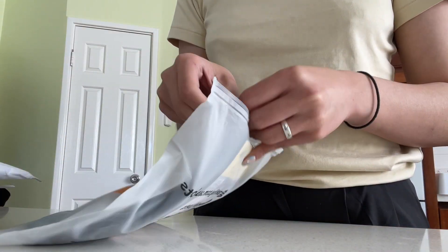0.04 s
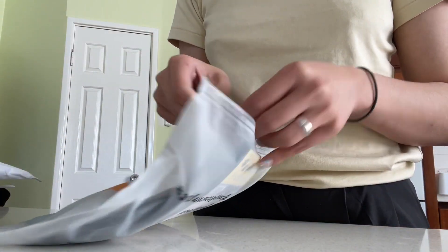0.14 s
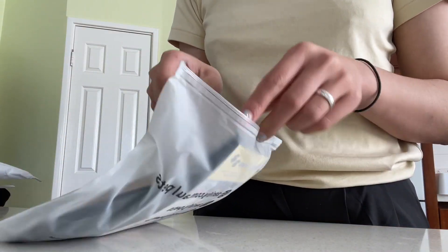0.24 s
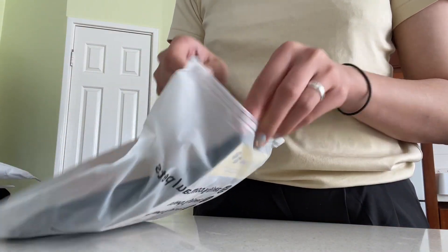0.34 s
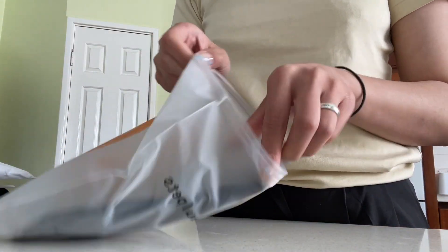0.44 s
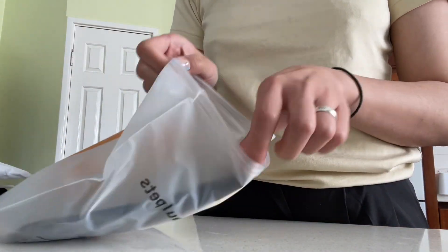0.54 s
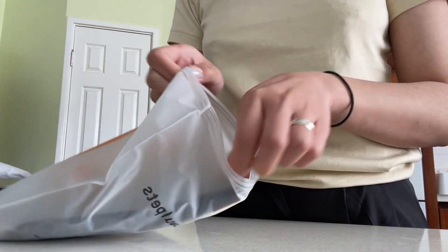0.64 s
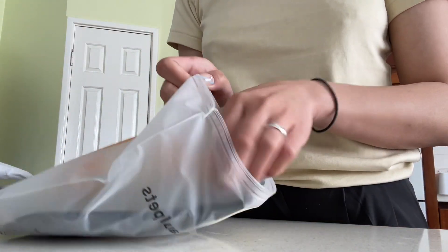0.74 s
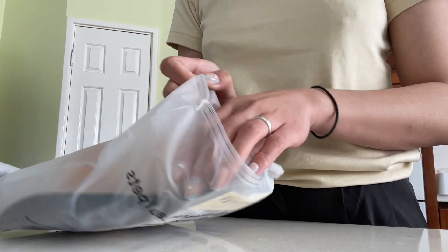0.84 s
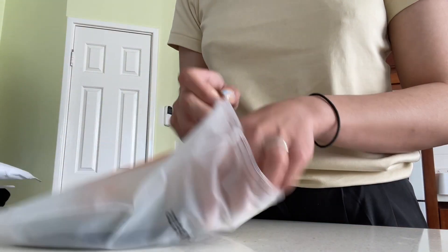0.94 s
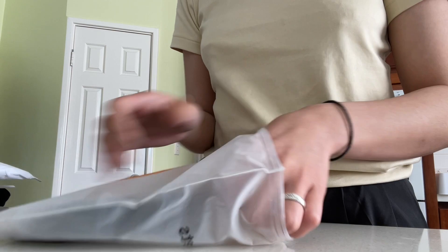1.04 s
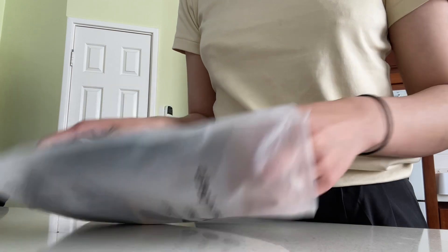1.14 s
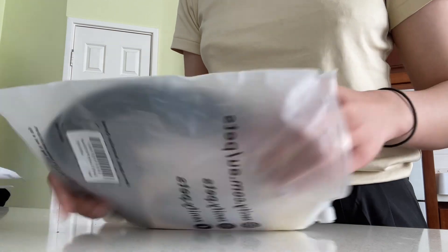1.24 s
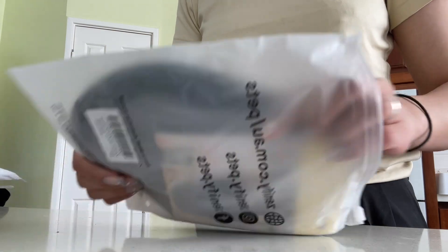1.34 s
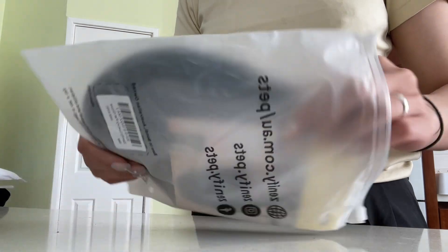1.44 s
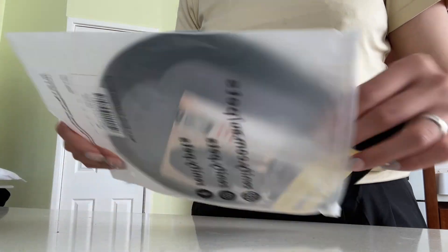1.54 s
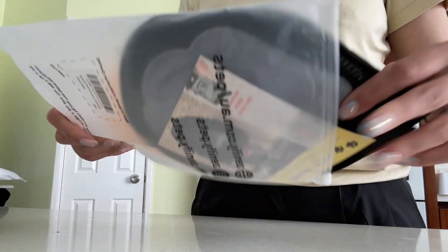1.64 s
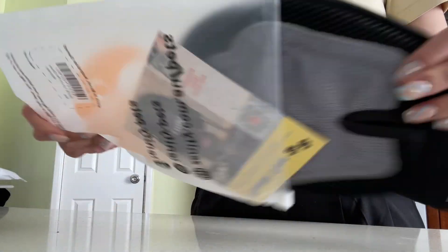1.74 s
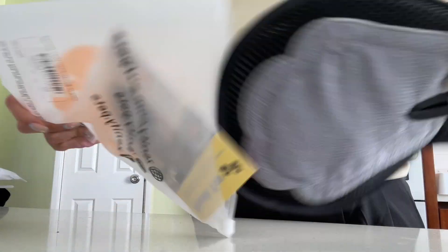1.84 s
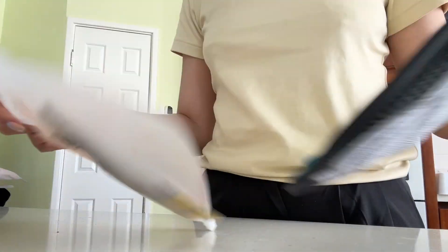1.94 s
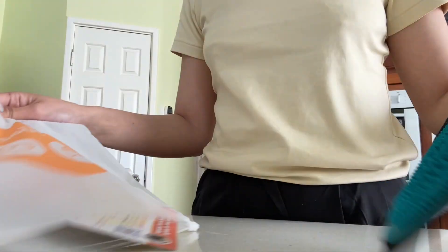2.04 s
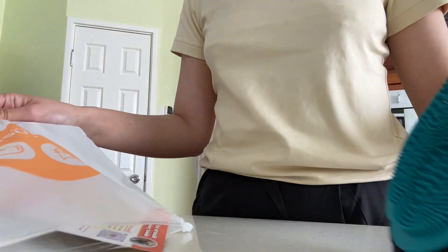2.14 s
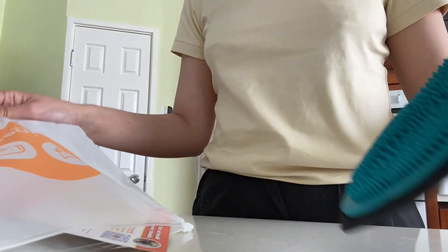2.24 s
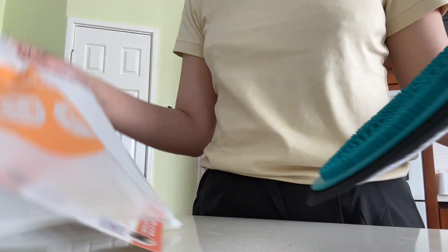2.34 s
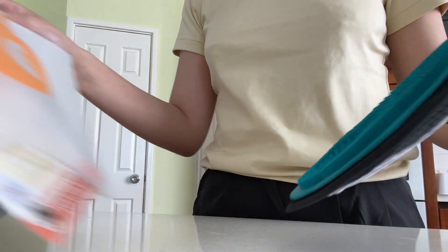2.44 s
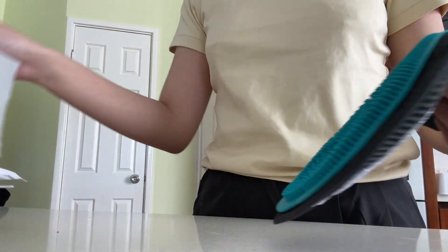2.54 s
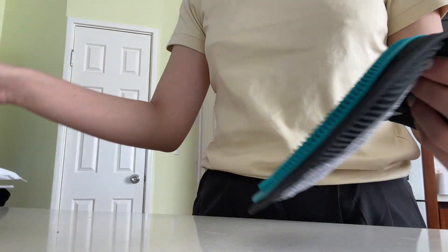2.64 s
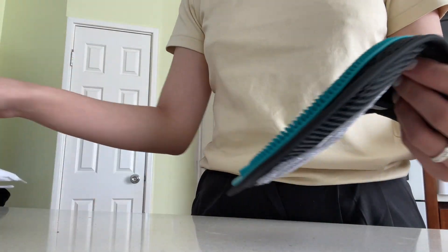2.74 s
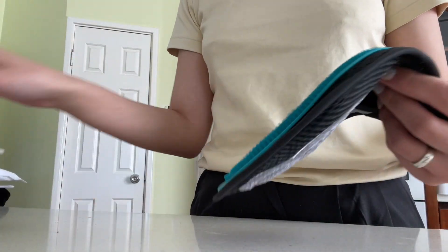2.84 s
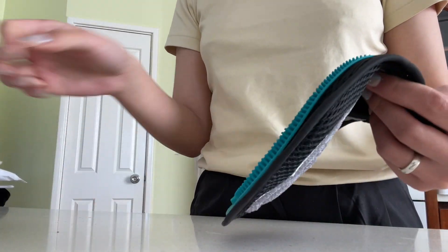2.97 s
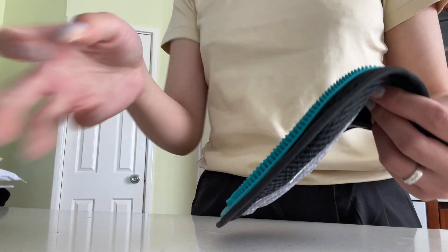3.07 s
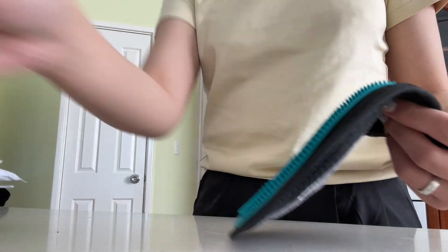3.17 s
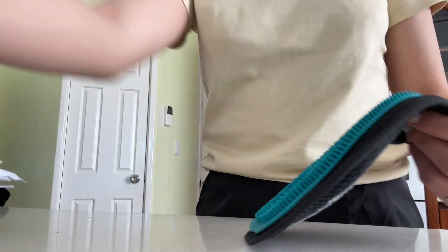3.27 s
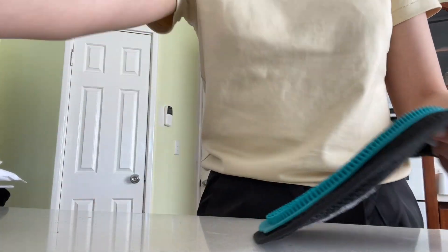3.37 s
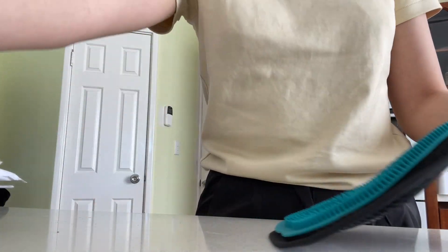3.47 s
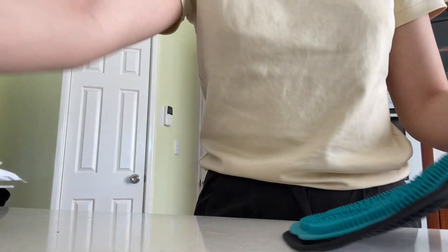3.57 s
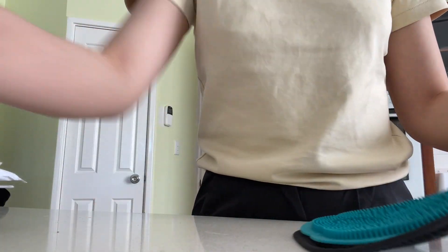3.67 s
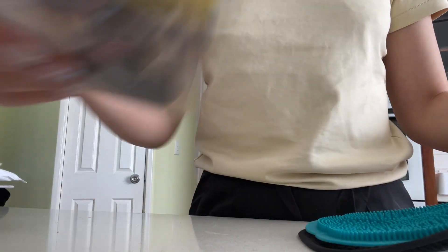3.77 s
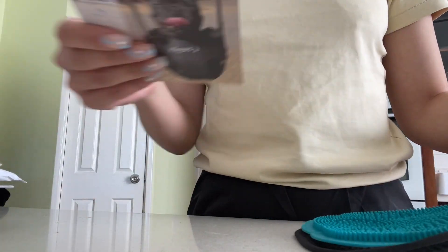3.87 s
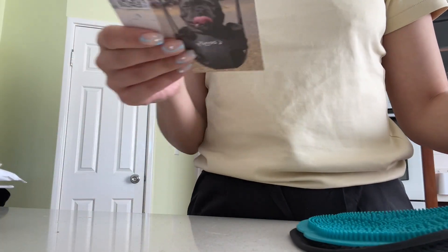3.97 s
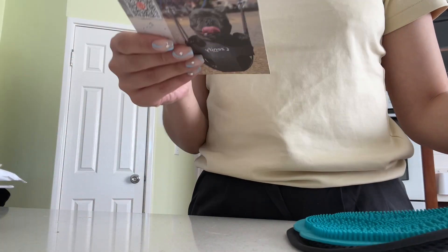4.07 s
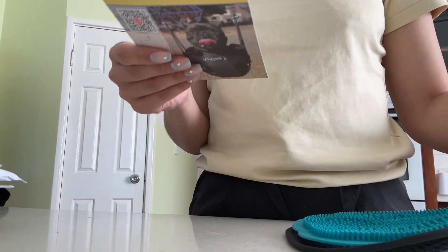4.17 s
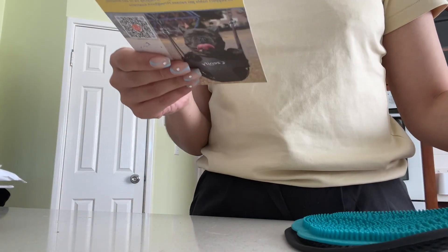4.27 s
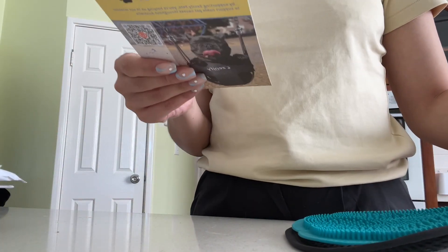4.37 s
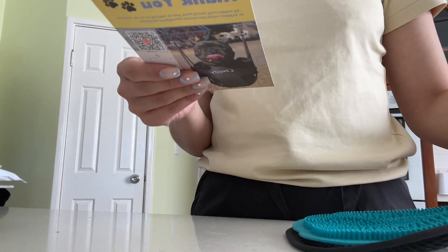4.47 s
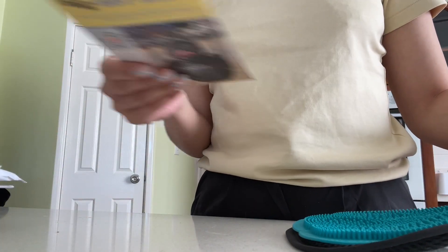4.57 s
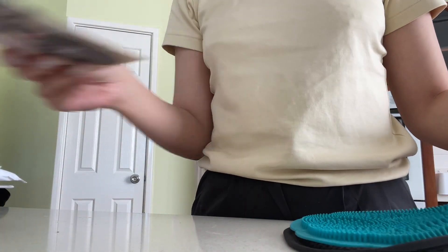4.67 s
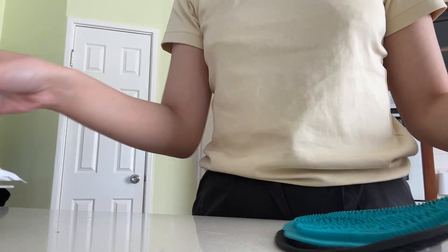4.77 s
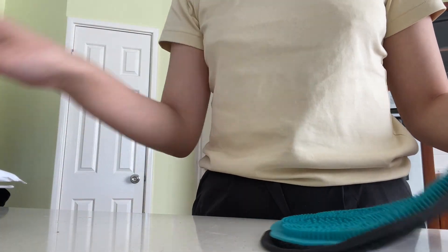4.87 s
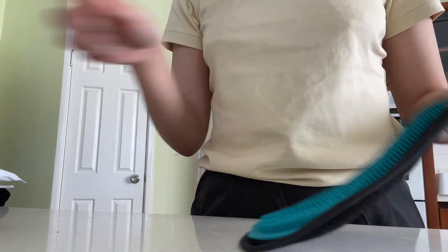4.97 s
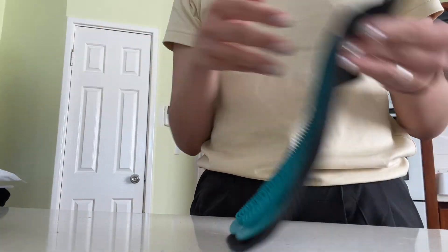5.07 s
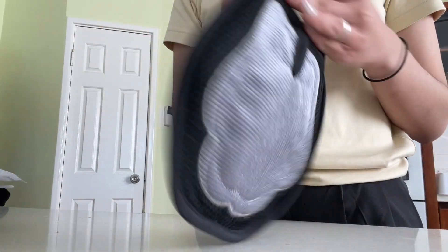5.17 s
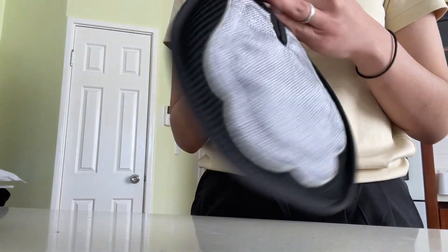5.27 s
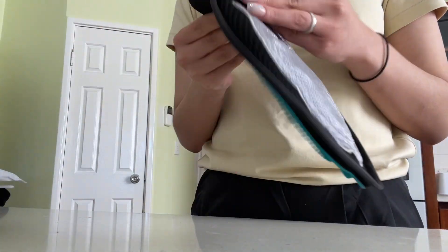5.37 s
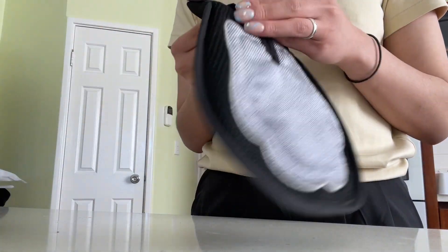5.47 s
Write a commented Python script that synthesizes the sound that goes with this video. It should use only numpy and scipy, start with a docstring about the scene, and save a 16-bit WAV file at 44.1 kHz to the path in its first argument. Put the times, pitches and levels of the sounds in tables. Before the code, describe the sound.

Close stereo sound of a soft plastic bag being opened over a kitchen counter in a quiet room. From 0 to 1.3 seconds, fingers work the film: crisp snaps, tiny crackles and rounder, hollow pops over uneven rustling, strongest around 0.5 and 0.8 to 1.1, with a few dull low bumps. From about 1.3 to 1.9 a rubber-and-cloth glove slides out in a smoother, broader rush, loudest near 1.6 to 1.7. The crinkle then falls away, leaving small rustles and ticks around 2.4 to 2.6. A light knock comes at 2.7, a firmer one at 3.4, and another with a brighter rustle at 3.6 to 3.75, each with a short counter ring. Near quiet follows around 4 to 4.5. Soft, dull cloth and palm strokes finish from 4.5 to 5.5, with faint taps near 4.9 and 5.2 and a barely audible low room hum.

```python
"""Sharp snaps of soft plastic film come first, over a sliding rustle: hands open a bag on a kitchen counter.
A rubber-and-cloth glove slides out in a smoother rush, then bag and card are put aside with knocks on the counter.
Snaps, pops and knocks are short tones with noise; the rustle is noise, crackle and puckers shaped in time and pitch.
The counter adds ringing modes and a bounce, and a faint room lies behind; two microphones listen close by."""
import sys
import numpy as np
from scipy import signal
from scipy.fft import rfft, irfft, next_fast_len
from scipy.io import wavfile
from scipy.ndimage import uniform_filter1d, map_coordinates

SR = 44100
rng = np.random.default_rng(int(sys.argv[2]) if len(sys.argv) > 2 else 0)


def dump(signal):
    """Clip the signal to [-1, 1] and save it as 16-bit WAV at the path in sys.argv[1]."""
    limited = np.clip(np.atleast_2d(signal).T, -1, 1)
    pcm = np.round(limited * 32767).astype(np.int16)
    wavfile.write(sys.argv[1], SR, pcm)


N = 242991  # length in samples
STFT = dict(fs=SR, nperseg=512, noverlap=384)


def amp(db):
    """Turns decibels into an amplitude factor."""
    return 10 ** (np.asarray(db) / 20)


def evened(x):
    """Scales a sound to an RMS of one."""
    return x / np.sqrt(np.mean(x ** 2) + 1e-20)


def locally_evened(x):
    """Divides a sound by its own RMS over a sliding window of about 0.2 s."""
    return x / np.sqrt(uniform_filter1d(x ** 2, 9000) + 1e-12)


def read(points, hz):
    """Reads a frequency curve, joined by straight lines on a log frequency axis."""
    f, value = np.transpose(points)
    return np.interp(np.log(hz + 1), np.log(f + 1), value)


def curve(rows, t):
    """Reads every column of a table over time, joined by straight lines."""
    s, *columns = np.transpose(rows)
    return [np.interp(t, s, c) for c in columns]


def add(mix, s, sound):
    """Lays a sound into the mix from time s in seconds."""
    part = mix[round(s * SR):][:len(sound)]
    part += sound[:len(part)]


def coloured(x, gain):
    """Multiplies the whole spectrum by gain(Hz)."""
    size = next_fast_len(x.shape[-1])
    spectrum = rfft(x, size) * gain(np.fft.rfftfreq(size, 1 / SR))
    return irfft(spectrum, size)[..., :x.shape[-1]]


def band(hz, centre_hz, width_hz):
    """Resonance-shaped hump that is one at its centre and a half at the edges of its width."""
    return 1 / (1 + (2 * (hz - centre_hz) / width_hz) ** 2)


# Likeness of the noise at the two microphones.
# Each row: frequency in Hz, left-right likeness from 0 to 1.
LIKENESS = [(60, 0.96), (150, .75), (300, 0.41), (600, 0.11), (1500, 0.097), (5000, 0.055)]


def noise_pair():
    """White noise at two microphones, most alike in the bass."""
    left, other = rng.standard_normal((2, N))
    shared = coloured(left, lambda hz: read(LIKENESS, hz))
    own = coloured(other, lambda hz: np.sqrt(1 - read(LIKENESS, hz) ** 2))
    return np.array([left, shared + own])


# Decay of the scatter from nearby surfaces.
# Each row: frequency in Hz, time to fall by 60 dB in seconds.
SCATTER_DECAY = [(300, 0.26), (1500, 0.12), (6000, 0.12), (16000, 0.061)]


def scattered(pair, wet_db):
    """Adds the scatter of nearby surfaces as a decaying noise tail, different for each microphone."""
    hz, t, z = signal.stft(rng.standard_normal((2, SR // 3)), SR, nperseg=128)
    decay = amp(-60 * t / read(SCATTER_DECAY, hz)[:, None])
    tail = signal.istft(z * decay, SR, nperseg=128)[1]
    tail = np.pad(tail / np.linalg.norm(tail[0]), ((0, 0), (60, 0)))  # 60 samples before the tail starts
    return pair + amp(wet_db) * signal.oaconvolve(pair, tail, axes=1)[:, :N]


# Where the hands work.
# Each row: time in seconds, left minus right in dB, lead of the left microphone in ms.
HAND_PLACE = [(.2, 9, 0.15), (.7, 7.5, 0.19), (1.2, 6.5, 0.19), (1.6, 21, 0.035), (1.85, 12.5, 0.13),
              (2.4, 4, 0.39), (2.8, 5, 0.51), (3.2, 8, 0.55), (3.7, 15, 0.55), (4.2, 0, 0.2),
              (4.85, -0.5, 0.51), (5.2, 3, 0.099)]


def placed(x):
    """Puts a lasting sound where the hands are: the right microphone gets a delayed, rescaled copy."""
    n = np.arange(N)
    pan_db, lead_ms = curve(HAND_PLACE, n / SR)
    delayed = map_coordinates(x, [n - lead_ms * SR / 1000], order=3)
    return np.array([x, amp(-pan_db) * delayed])


def strike(pair, s, db, rise_ms, t60, pan_db, stray_ms, carrier):
    """Shapes a carrier by a rise and a decay and lays it at both microphones, somewhere near the hands."""
    lead_ms = curve(HAND_PLACE, s)[1] + stray_ms
    t = np.arange(len(carrier)) / SR
    rise = max(rise_ms, .1) / 1000
    swell = np.sin(np.pi / 2 * t / rise) ** 2
    decay = amp(-60 * (t - rise) / max(t60, .001))
    sound = np.where(t < rise, swell, decay) * carrier
    add(pair[0], s, amp(db + pan_db / 2) * sound)
    add(pair[1], s + lead_ms / 1000, amp(db - pan_db / 2) * sound)


RAGGED_DB, RAGGED_MS = 4.5, 1.2  # full-strength unevenness and its pace


def ragged(noise, peak_s):
    """A crease gives way in small jerks: gain is sure at the peak and uneven away from it."""
    distance_ms = abs(np.arange(len(noise)) / SR - peak_s) * 1000
    away = np.clip(distance_ms / RAGGED_MS - 1, 0, 1)
    jerks = evened(uniform_filter1d(noise, int(RAGGED_MS * SR / 1000) + 1))
    return amp(RAGGED_DB * away * np.clip(jerks, -2, 1.5))


def rings(table, stray_ms, waver, smooth_cycles, puff_share, jerky, wet_db):
    """Each event is a few wavering cycles at its pitch, with a puff of noise around and above that pitch."""
    pair = np.zeros((2, N))
    chance = rng.standard_normal((len(table), 3, 6000))
    for (s, db, hz, t60, pan_db, rise_cycles), (a, b, luck) in zip(table, chance):
        drift = evened(uniform_filter1d(a, int(smooth_cycles * SR / hz) + 1))
        tone = np.sin(2 * np.pi * np.cumsum(hz * (1 + waver * drift)) / SR)
        puff = evened(coloured(b, lambda f: band(f, 1.76 * hz, 2.8 * hz) ** 2 * f / (f + hz / 2)))
        rise_s = rise_cycles / hz
        carrier = (tone + puff_share * puff) * ragged(luck, rise_s) ** jerky
        strike(pair, s, db, 1000 * rise_s, t60, pan_db, stray_ms * luck[0], carrier)
    return scattered(pair, wet_db)


TICK_RISE_MS, TICK_STRAY_MS = 0.6, 0.065  # rise; typical random shift between the microphones
# Bright ticks of creases that flip.
# Each row: start in seconds, level in dB, pitch in Hz, left minus right in dB, relative level of the top in dB,
# time to fall by 60 dB in seconds.
CREASE_TICKS = [(0.0216, -17, 3374, -1.5, -7, 0.011), (0.0355, -23, 2760, 0, -17, 0.0084),
                (.052, -37, 3000, -2, -17, 0.0054), (0.06, -40, 3670, -7, -18, 0.0091),
                (0.074, -27, 6200, -8, -16, 0.004), (0.168, -24, 3960, -10.5, 9, 0.0017),
                (0.1781, -52, 2750, -5, -11, 0.0093), (0.181, -48, 2900, 4, -11.0, 0.0035),
                (0.218, -38.5, 2700, -1, -3, 0.0037), (0.2339, -27.5, 2500, -1, -0.5, 0.011),
                (0.239, -21.5, 2700, 3, -19, 0.0042), (0.2579, -37, 2700, 1, -13, 0.0036),
                (0.283, -41, 2570.0, 9, -24, 0.0082), (0.3061, -42, 3500, 2.0, -23, 0.011),
                (0.3327, -49, 2680, -2.0, -21, 0.0163), (0.3423, -32, 2590, -13, -25, 0.02),
                (0.354, -22.5, 2680, 1, -5.5, 0.0071), (0.3578, -29, 2610, -3, -3, 0.0184),
                (0.3633, -33, 2660, -6, -14.0, 0.0037), (0.4078, -24, 2750.0, 1, -29, 0.011),
                (0.4253, -40, 4900.0, 0, -11, 0.0068), (0.4473, -34, 7660, -1, -4, 0.0128),
                (0.4626, -28, 3590.0, -9, -19, 0.014), (0.476, -27, 2750, 16, -24, 0.0055),
                (0.4893, -26.5, 3670, -10, 2, 0.0091), (0.5054, -36.5, 5500, -1, 4, 0.011),
                (0.533, -29, 2820, 6, -14.0, 0.0037), (0.5405, -26, 2550, 5, -20, 0.0045),
                (0.568, -31, 3070, -4, -11, 0.0098), (0.674, -41, 2680, -9, -11, 0.0078),
                (0.676, -49, 2640, -7, -19.0, 0.013), (0.706, -29, 3570, 0, -17, 0.02),
                (0.7093, -28, 6000, -2, 3.5, 0.01), (0.761, -38, 5300, -8, -13, 0.01),
                (0.789, -33, 6150, -11, 11, 0.0062), (0.8279, -18, 5800, 3.5, -28, 0.0037),
                (0.847, -13.5, 3810, 2.5, -15, 0.0041), (0.8505, -30, 2800, -7, 2, 0.0041),
                (0.9152, -23, 3600, 0.5, -31, 0.011), (1.0008, -25.5, 5740, -1.5, -7, 0.017),
                (1.0165, -24, 3600, -0.5, -20.5, .01), (1.037, -23, 7500, -6, -1, 0.008),
                (1.0438, -20, 2470, -6, -19, 0.018), (1.054, -22, 2600, -0.5, -19.5, 0.017),
                (1.0721, -8, 6490, -1, -12.5, 0.0015), (1.0766, -54, 6960, -4, -15, 0.0049),
                (1.164, -27, 3350, -5, -24, 0.0097), (1.1871, -21.5, 2850, 0, -27, 0.024),
                (1.299, -27, 2460, 0, -20, 0.0097), (1.3047, -25, 2800, -8, -20, .012),
                (1.3154, -23.5, 3100, -7, -17, 0.016), (1.3228, -20, 2660, 4, -23, 0.0054),
                (1.3582, -27, 3120, -15, -21, 0.0055), (1.3631, -17.5, 2930, 4.0, -28, 0.0055),
                (1.3938, -21.5, 2670, 1.0, -13, 0.0085), (1.4621, -31.0, 2750, 1, -28, 0.013),
                (1.5309, -20.5, 5650, -3, -25, 0.0078), (1.706, -13.5, 3000, 1, -31, 0.005),
                (1.7174, -16, 3230, 0.5, -7.5, 0.0099), (1.759, -21, 2750.0, 0, -21, 0.02),
                (1.851, -28, 2420, -2.0, -17, 0.008), (1.938, -38, 2940.0, -1, -13, 0.0088),
                (1.941, -49, 2980, 0, -10.0, 0.0085), (1.954, -32, 2460, -15, 6, 0.0051),
                (1.9935, -44, 2490, 3, -22, 0.021), (2.0208, -44.5, 4930, -2, -16, 0.0126),
                (2.0875, -40, 4800, -2.0, -8, 0.0032), (2.1294, -43.5, 7440, -11, -2, 0.014),
                (2.209, -60, 2630.0, -4, -22, 0.0092), (2.2726, -55, 7300, -5, -15, 0.0036),
                (2.329, -55, 2520, 7, -20.0, 0.02), (2.377, -29.5, 3640, 3, 5, 0.0098),
                (2.384, -22, 7400, -7, -1, 0.0079), (2.389, -28, 7800, -4, -12, 0.01),
                (2.403, -33.5, 2600, 0.5, -8, .015), (2.504, -54, 4180, -4, -10.0, 0.0128),
                (2.53, -42.5, 4700, -1, 8, 0.012), (2.5929, -28.5, 2600, 1, -10, 0.01),
                (2.6291, -25, 6700, -4, 6, 0.0072), (2.716, -45, 3180, 6, -16, 0.0056),
                (2.7303, -35, 2620, 6, -6, 0.0081), (2.819, -44.5, 2950, 10, -16, 0.013),
                (2.838, -56, 2580.0, 2.0, -14, 0.0085), (2.8634, -43, 2740, 4, -3, 0.029),
                (2.947, -48, 3780, 1, -7.5, 0.012), (3.042, -103, 5870.0, 9, -9, 0.0136),
                (3.415, -28.5, 2640, 1, -16, 0.017), (3.4642, -38, 7550, -1, -5, 0.018),
                (3.5103, -44, 4580, 4, -14, 0.018), (3.605, -43, 2120, 2, -15, 0.017),
                (3.6247, -35, 2100, 2, -13.5, .022), (3.7511, -25, 3900, 3, -11.5, 0.0089),
                (3.907, -57.5, 5300, 6, -3, 0.017), (3.9376, -50, 7460, -9.0, -15, 0.0083),
                (4.3413, -49.5, 3740, 0, -18, 0.0041), (4.382, -64, 4510.0, 5.5, -8.5, 0.0085),
                (4.8854, -35.5, 2880, 2, -2.5, 0.014), (5.165, -43, 6520, -10, -15, 0.0074),
                (5.2137, -38, 7200, 2, -9, 0.0031), (5.2202, -38.5, 7250, 7, -7.0, 0.0037)]


def ticks():
    """A crease flips: one hard click, a short ring, noise that leans to its pitch, and a shorter top."""
    pair = np.zeros((2, N))
    t, rise = np.arange(1500) / SR, TICK_RISE_MS / 1000
    chance = rng.standard_normal((len(CREASE_TICKS), 4, len(t)))
    for (s, db, pitch_hz, pan_db, top_db, t60), (a, b, c, luck) in zip(CREASE_TICKS, chance):
        lean = lambda hz: (hz > 1500) * (hz < 8500) * band(hz, pitch_hz, .9 * pitch_hz)
        wide = evened(coloured(a, lean))
        ring = np.sin(2 * np.pi * pitch_hz * t + 2.5 * uniform_filter1d(c, 12))  # unsteady phase
        u = (t - rise) * pitch_hz * 2.7
        click = np.sign(a[0]) * u * np.exp(.5 - u ** 2 / 2)  # one swing up and down, either way first
        top = evened(coloured(b, lambda hz: hz > 8500)) * 1.09 * np.exp(-abs(t - rise) / 0.0045)
        body = (0.75 * ring + 0.6 * wide) * ragged(luck, rise)
        carrier = body + .6 * click + amp(top_db) * top
        strike(pair, s, db, TICK_RISE_MS, t60, pan_db, TICK_STRAY_MS * luck[0], carrier)
    return scattered(pair, wet_db=-10)


# Rounder pops of the film and card.
# Each row: start in seconds, level in dB, pitch in Hz, time to fall by 60 dB in seconds, left minus right in dB,
# rise in cycles.
FILM_POPS = [(0.0206, -35.5, 1280, 0.031, 3, 2.2), (0.0341, -35, 2200, 0.012, 12, 1.9),
             (0.043, -32, 890, 0.015, 13, 1.1), (0.1681, -40, 2050, 0.029, -1, 2.5),
             (0.1711, -34, 780, 0.025, 10, 2.7), (0.1827, -27.5, 976, 0.022, 2, 0.81),
             (0.2369, -33, 1060, 0.021, 0, 1.3), (0.2484, -29, 970, 0.012, 8.0, 0.99),
             (0.2676, -30, 910, 0.035, 3, 2.5), (0.3049, -37, 890.0, 0.013, -2, 2.3),
             (0.3324, -29.5, 820, 0.012, 6, 0.7), (0.3412, -31, 2110.0, 0.013, 3, 2.2),
             (0.3538, -27.5, 1960, 0.023, 9, 4.7), (0.3643, -45, 2000, 0.014, -2.0, 2.5),
             (0.4481, -23, 1060, 0.016, 6.5, 0.98), (0.4618, -28, 905, 0.011, 6, 2.1),
             (0.4768, -10, 680, 0.016, 6, 0.77), (0.4896, -18, 1640, 0.0041, 4, 2.1),
             (0.5052, -19.5, 774, 0.014, 6, 1.8), (0.5332, -21, 1960, 0.019, 1, 1.6),
             (0.5395, -33, 1950, 0.021, -11, 2.5), (0.5812, -30.5, 790.0, 0.024, 7, 1.3),
             (0.5867, -26, 1750, 0.025, 1, 2.3), (0.6201, -30, 1860, 0.04, -1, 1.5),
             (0.6277, -33, 1010, 0.026, 10, 1.4), (0.6761, -21.5, 967, 0.02, 8, 1.9),
             (0.7045, -27.5, 805, 0.021, 6, 2.1), (0.7095, -25, 950, 0.012, 7, 1.8),
             (0.7135, -29, 1050, 0.012, 5, 1.1), (0.7617, -26.5, 1830, 0.025, 10.5, 1.9),
             (0.7765, -27, 924, 0.017, 3, 2.6), (0.7812, -30, 790, 0.012, 9, 3.7),
             (0.7765, -19.5, 1900, .012, 1, 1.6), (0.7883, -26, 910, 0.0074, 8, 0.74),
             (0.8281, -21, 1000, 0.0067, -2, 0.87), (0.837, -24.5, 740, 0.015, 9, 1.2),
             (0.8447, -14.5, 870, 0.0047, 6, 0.52), (0.8646, -30, 1770, 0.047, -1, 2.3),
             (0.9155, -19, 960, 0.006, 5, 0.99), (0.9272, -26, 820, 0.011, 13, 1.1),
             (0.9573, -30, 744, 0.016, 7, 3.2), (.9598, -25, 1290, 0.011, -1, 1.8),
             (0.9819, -18, 930, 0.0038, 7, 1.1), (0.9815, -24, 2320, 0.0049, 7, .8),
             (0.9857, -31, 880, 0.011, 7, 2.1), (1.0149, -14.5, 674, 0.015, 5, 2.1),
             (1.0471, -25, 725, 0.039, 9, 4.3), (1.0723, -19, 853, 0.0082, 5, 0.98),
             (1.1532, -37, 830, 0.032, 7, 2.1), (1.1674, -32, 880, 0.01, 5.0, 2.9),
             (1.1877, -19.5, 1750, 0.014, 1, 1.7), (1.213, -30.5, 860, 0.04, 13, 2.1),
             (1.2578, -28, 876, 0.033, 1, 3.8), (1.281, -40, 820, .012, 6, 1.4),
             (1.2955, -30.5, 860, 0.02, 8, 1.7), (1.3171, -28, 1020, 0.03, 7, 2.3),
             (1.333, -32, 840, 0.012, 8, 1.1), (1.3465, -27, 1540, 0.012, -6, 1.1),
             (1.379, -32, 910, .012, 5, 1.6), (1.3934, -27, 706, 0.014, -0.5, 2.7),
             (1.4251, -36, 856, 0.017, 13.5, 1.8), (1.4404, -40, 1900, 0.024, -1, 1.8),
             (1.4484, -36, 1840, 0.011, 2.0, 2.4), (1.462, -42, 1540.0, 0.026, 3, 1.3),
             (1.4786, -40, 1790, 0.019, 10, 2.9), (1.5008, -40, 840, 0.013, 6, 3.5),
             (1.5321, -35, 950, 0.02, 11, 3), (1.5688, -19, 2010, 0.013, 4, 1.8),
             (1.5696, -19, 812, 0.035, 6, 1.4), (1.5761, -25.5, 826, 0.017, 5, 5.1),
             (1.5785, -22, 1980, 0.011, -2, 3.1), (1.591, -19, 840, 0.01, 5, 1.5),
             (1.6093, -21.5, 820, 0.026, 4, 0.53), (1.6887, -24.5, 1750, 0.038, 3, 2.3),
             (1.7059, -22, 1730, 0.013, -3, 2.0), (1.7171, -17.5, 1570, 0.013, 4, 0.98),
             (1.7274, -21.5, 850, 0.0088, 9, 1.1), (1.8265, -28, 764, 0.011, 4, 2.2),
             (1.8502, -33, 880, 0.017, 12, 1.4), (1.8744, -19.5, 766, 0.01, 5, 1.2),
             (1.8811, -40, 670, 0.046, -13, 2.8), (1.927, -36.5, 1830, 0.021, 5, 2.5),
             (1.9362, -35, 850, 0.039, 3, 2), (1.9375, -32, 1980, .02, 4, 2.3),
             (1.9536, -29.5, 2100, 0.009, 2, 2.1), (1.9536, -38, 790, 0.011, 1, 1),
             (2.0854, -43, 1960, 0.015, -1, 1), (2.113, -40, 960, 0.03, 9, 1.3),
             (2.1315, -40, 890, 0.0086, 7, 2.7), (2.3323, -49.5, 1940, 0.056, 1.0, 3.1),
             (2.377, -52, 905, 0.011, 12, 0.79), (2.3821, -47, 780.0, 0.016, -4, 2.8),
             (2.4043, -38, 990, 0.015, 3, 3.8), (2.505, -51, 1240, 0.021, -1, 1.8),
             (2.5926, -47, 2140, 0.02, -8, 3.5), (2.5979, -48, 950, 0.021, 12, 2.8),
             (2.6288, -40, 1320, 0.016, -3, 2.8), (2.6354, -41, 605, 0.016, 6, 1.5),
             (2.7163, -27.5, 1370, 0.018, 0, 1.1), (2.7286, -30, 597, 0.011, 9, 0.77),
             (2.7349, -27, 666, 0.0059, 1, 2.8), (2.7423, -35, 760, 0.0093, 11, 2.5),
             (2.8176, -44, 664, 0.042, 1, 1.8), (2.8388, -48, 1270, 0.02, 2, 0.84),
             (2.8645, -37.5, 630, 0.02, 1, 2.8), (2.8748, -44, 634, 0.012, 6, 4.8),
             (3.4143, -26.5, 1370, 0.015, 3, 0.7), (3.4273, -23, 685, 0.0042, -6, 1.4),
             (3.4308, -21, 538, 0.027, 3.5, 1.6), (3.5116, -37, 910, 0.026, 6.5, 1.4),
             (3.5168, -40, 720, 0.019, -2, 3.4), (3.5852, -43, 950, 0.0099, 4, 2.6),
             (3.6237, -34.5, 704, 0.042, 2.5, 5.8), (3.6567, -30.5, 850, 0.021, 4.5, 1.9),
             (3.6617, -43, 686, 0.012, -4, 4), (3.7251, -30, 810, 0.028, 1, 1.5),
             (3.7526, -21, 802, 0.02, -0.5, 2.6), (4.8856, -36.5, 1400.0, 0.021, 6, 1.3),
             (5.1628, -41.5, 1070, 0.014, -19, 1.3), (5.214, -37, 820, 0.035, 0, 0.51),
             (5.2196, -35, 845, 0.015, -4, 1.6), (5.2248, -39, 870, 0.0062, -3.0, 2.7),
             (5.2547, -37.5, 770, 0.0062, 2.0, 2.4)]


def pops():
    """Film and card pop as short wavering tones with a little noise."""
    return rings(FILM_POPS, stray_ms=0.071, waver=0.13, smooth_cycles=0.64, puff_share=0.28, jerky=0.3,
                 wet_db=-12.5)


def crackle(per_s, spread_db, clump_db, decay_ms, count):
    """Tiny creases: clumped clicks of very uneven size, each kind a short burst around its own pitch."""
    clumps = amp(clump_db * evened(uniform_filter1d(rng.standard_normal(N), 500)))
    uneven = amp(spread_db * np.minimum(rng.exponential(1, N), 4))
    size = uneven * (rng.random(N) < per_s / SR) * clumps
    kind, t, out = rng.integers(0, count, N), np.arange(600) / SR, np.zeros(N)
    for k, pitch_hz in enumerate(np.geomspace(300, 12000, count)):
        burst = rng.standard_normal(len(t)) * np.exp(-t / (decay_ms / 1000 + .8 / pitch_hz))
        burst = coloured(burst, lambda hz: 0.63 + band(hz, pitch_hz, 1.6 * pitch_hz) ** 2)
        burst = np.sqrt(pitch_hz) * evened(burst)  # aims at an even level per Hz
        out += signal.oaconvolve(size * (kind == k), burst)[:N]
    return locally_evened(out)


def puckers(per_s, spread_db, cycles, count):
    """Small patches of film or cloth buckle: a few soft cycles each, at scattered middle pitches."""
    uneven = amp(spread_db * np.minimum(rng.exponential(1, N), 4))
    size = uneven * (rng.random(N) < per_s / SR)
    kind, out = rng.integers(0, count, N), np.zeros(N)
    for k, pitch_hz in enumerate(np.geomspace(350, 3000, count)):
        turns = np.arange(800) / SR * pitch_hz
        buckle = pitch_hz * turns * np.exp(-turns / cycles) * np.sin(2 * np.pi * turns)
        out += signal.oaconvolve(size * (kind == k), buckle)[:N]
    return locally_evened(out)


STROKE_RISE_S = 0.017
SOFT_FROM_S, SOFT_RISE_S = 4.4, 0.023  # the last strokes are a palm on cloth and swell more slowly
# Steady handling between strokes.
# Each row: time in seconds, relative level of the middle in dB, relative level of the treble in dB.
HANDLING = [(0.0, -48, -61), (0.15, -43, -57), (0.67, -43.5, -49.5), (1.12, -36.5, -49.5), (1.3, -58, -60),
            (1.6, -27, -34.5), (1.72, -32.5, -42.5), (2.12, -52, -63.5), (2.39, -66.5, -82),
            (2.56, -49.5, -54.5), (2.75, -59, -55.5), (2.96, -58, -74.5), (3.45, -59, -65),
            (3.61, -58, -78), (3.78, -45.5, -68), (4.1, -77.5, -82), (4.59, -71, -91), (4.82, -65, -60),
            (5.06, -51, -67), (5.51, -59, -70)]
# Strokes that start at once, hold and die away.
# Each row: start in seconds, hold in seconds, relative level of the middle in dB, of the treble in dB,
# fade in dB per second.
HAND_STROKES = [(0.002, 0.068, -34.5, -44, 199), (0.107, 0.035, -47, -46, 200),
                (0.143, 0.055, -41, -46.5, 199), (0.225, 0.016, -33.5, -62, 155),
                (0.338, 0.02, -33, -46, 57), (0.608, 0.018, -34.5, -68, 150), (0.768, 0.02, -36, -43, 189),
                (0.444, 0.069, -28.5, -39, 244), (0.654, 0.062, -31, -44, 150),
                (0.826, 0.017, -27.5, -49, 252), (0.934, 0.1, -27.5, -38.5, 256),
                (1.138, 0.19, -32, -39.5, 122), (1.29, 0.082, -32.5, -54, 124), (1.522, 0.3, -33, -37, 193),
                (2.094, 0.022, -43.5, -58, 153), (1.36, 0.012, -36, -64, 247), (1.91, 0.028, -47, -68, 144),
                (2.343, 0.13, -49, -55.5, 66), (2.589, 0.041, -46.5, -52.5, 145),
                (2.705, 0.055, -37.5, -49, 118), (2.854, 0.02, -43, -55.5, 153),
                (3.186, 0.1, -64, -87.5, 99.5), (3.404, 0.018, -45.5, -49.5, 70), (3.51, 0.1, -71, -55, 46),
                (3.584, 0.092, -45, -44.5, 134), (3.7, 0.01, -43, -50, 66.5),
                (3.658, 0.018, -54, -40, 200.5), (4.315, 0.043, -65, -79.5, 100),
                (4.537, 0.099, -50.5, -69, 74.5), (4.655, 0.049, -72, -58, 64),
                (4.809, 0.093, -43, -69, 107), (5.064, 0.064, -40, -60, 170),
                (4.867, 0.058, -51, -53.5, 200), (2.369, 0.027, -42.5, -44.5, 157),
                (3.77, 0.036, -51, -80, 62), (5.2, 0.037, -51, -53.5, 150),
                (4.95, 0.054, -44.5, -57.5, 140), (5.147, 0.038, -42.5, -57, 200),
                (5.156, 0.13, -71, -57.5, 92), (5.24, .015, -50, -56, 250), (5.294, 0.045, -45, -60.5, 116),
                (5.38, 0.037, -50, -64.5, 170), (5.47, .03, -53.5, -71, 100)]


def rubbing_db(t):
    """Level of the middle and of the treble: steady handling plus every stroke, added as powers."""
    power = amp(curve(HANDLING, t)) ** 2
    for start, hold, middle_db, treble_db, fade_db in HAND_STROKES:
        rise_s = SOFT_RISE_S if start > SOFT_FROM_S else STROKE_RISE_S
        rise = np.clip((t - start) / rise_s, 0, 1)
        fade = amp(-fade_db * np.maximum(t - start - hold, 0))
        power = power + (amp([[middle_db], [treble_db]]) * rise * fade) ** 2
    return 10 * np.log10(power)


BAG_GONE_S = 2.46  # after this the hands rub rubber, cloth and card, with finer grain than film
PULL_FROM_S, PULL_TO_S = 1.3, 1.86  # the glove slides out: a smoother rush
FILM_GRAIN, PULL_GRAIN, CLOTH_GRAIN = 0.5, 0.36, 0.059  # share of crackle in the power, 0-1
PUCKER_SHARE, PUCKER_HZ, PUCKER_WIDTH_HZ = 0.42, 1200, 3000  # largest share of puckers until the bag is gone
CLOTH_PUCKER = 0.18  # cloth puckers less than film: part of that share kept once the bag is gone
POUCH_EMPTY_S = 2
# Rumble through the counter: relative level at a middle level of -45.5 dB, and how far it follows in dB per dB.
BASS_DB, BASS_FOLLOWS = -48.5, 0.83
# Air inside the open bag rings during the first two seconds.
# Each row: frequency in Hz, width in Hz, boost in dB.
POUCH_AIR = [(820, 250, 1), (2080, 280, 4), (2750, 140, 4), (3600, 250, 4.5)]
# Slow change of colour at the two ends.
# Each row: time in seconds, extra level of the bass in dB, of the highest treble in dB.
END_COLOUR = [(0, -7, -0.5), (.5, 0, -5), (1.05, -1, 0), (1.4, -6, -3), (1.9, -1, 0), (2.3, -3.5, -3.5),
              (2.7, -0.5, 0), (3.1, -2.5, 0), (3.45, 2, -7), (3.55, 3, 13), (3.72, -6, 3.5), (3.85, -4, -6),
              (4.3, 6, 5), (4.65, -2, -0.5), (5, -2.5, 0), (5.51, -3, 2)]
# Slow change of colour in the upper middle.
# Each row: time in seconds, extra level near 1.9 kHz in dB, near 2.5 to 3.5 kHz in dB.
UPPER_COLOUR = [(0, 3.5, 1.5), (.7, 5, -3), (1.3, 1, 0), (1.8, 8.5, -1.5), (2.4, 2.5, -1), (3.0, -3, -4),
                (3.6, 5.5, -2), (3.85, 5, -4), (4.3, 1.5, 1.5), (4.6, -1.5, 0.5), (5.0, -5, -4),
                (5.51, -4, -5.5)]
# The left microphone faces the bass of the rubbing.
# Each row: frequency in Hz, left minus right in dB.
BASS_FACING = [(60, 1.5), (300, 0), (800, -0.5), (2500, -2), (6000, 0.5)]


def rubbing_spectrum_db(hz, t):
    """Level at every frequency and moment; the rumble follows the rubbing by less than its full swing."""
    rub_db, treble_db = rubbing_db(t)
    heavier_db, brighter_db = curve(END_COLOUR, t)
    near_db, far_db = curve(UPPER_COLOUR, t)
    bass_db = BASS_DB + BASS_FOLLOWS * (rub_db + 45.5) + heavier_db
    top_db = treble_db + brighter_db
    # level per Hz at a few anchor frequencies, joined on a log axis
    anchors = [
        (30, bass_db - 40.0), (55, bass_db + 3), (85, bass_db + 13.5),
        (180, bass_db + 5.0), (260, bass_db + 11.5), (480, bass_db + 2.0),
        (750, rub_db - 0.5), (1300, rub_db - 9.5),
        (1900, rub_db - 11.0 + near_db), (2500, rub_db - 12.0 + far_db),
        (3500, treble_db - 3.5 + far_db), (7000, treble_db - 8.5),
        (11500, top_db - 10.5), (16000, top_db - 18)]
    anchor_hz, anchor_db = zip(*anchors)
    share = np.array([read(list(zip(anchor_hz, row)), hz) for row in np.eye(len(anchors))])
    pouch_db = sum(db * band(hz, f, w) for f, w, db in POUCH_AIR)
    return share.T @ np.array(anchor_db) + np.outer(pouch_db, t < POUCH_EMPTY_S)


def rustle():
    """Sliding hiss, crackle and puckers are blended, then take the level and colour of the rubbing."""
    s = np.arange(N) / SR
    bag_there = np.arange(N) < BAG_GONE_S * SR
    pulled = abs(s - (PULL_FROM_S + PULL_TO_S) / 2) < (PULL_TO_S - PULL_FROM_S) / 2
    grainy = np.where(pulled, PULL_GRAIN, np.where(bag_there, FILM_GRAIN, CLOTH_GRAIN))
    film = crackle(per_s=800, spread_db=2.0, clump_db=4.5, decay_ms=.4, count=16)
    cloth = crackle(per_s=3600, spread_db=1.0, clump_db=1.0, decay_ms=0.44, count=16)
    grains = scattered(placed(np.where(bag_there, film, cloth)), wet_db=-7)
    left, right = noise_pair()
    slide = np.array([left, 0.99 * right + 0.12 * placed(left)[1]])
    hz, t, rubbed = signal.stft(np.sqrt(1 - grainy) * slide + np.sqrt(grainy) * grains, **STFT)

    buckles = placed(puckers(per_s=500, spread_db=1.5, cycles=1.5, count=24))
    buckled = signal.stft(scattered(buckles, wet_db=-0.5), **STFT)[2]
    pucker_share = PUCKER_SHARE * band(hz, PUCKER_HZ, PUCKER_WIDTH_HZ) ** 2
    pucker_share = pucker_share[:, None] * np.where(t < BAG_GONE_S, 1, CLOTH_PUCKER)
    mixed = np.sqrt(1 - pucker_share) * rubbed + np.sqrt(pucker_share) * 0.3 * buckled

    level_db = rubbing_spectrum_db(hz, t)
    blurred = uniform_filter1d(rng.standard_normal(level_db.shape), 6, 0)
    patches = evened(uniform_filter1d(blurred, 8, 1))  # random louder and softer spots
    left, right = signal.istft(mixed * amp(level_db + 2.27 * patches + 10.0), **STFT)[1][:, :N]
    return np.array([left, coloured(right, lambda hz: amp(-read(BASS_FACING, hz)))])


# Soft knocks and slaps on the counter.
# Each row: start in seconds, level in dB, pitch in Hz, time to fall by 60 dB in seconds, left minus right in dB,
# rise in cycles.
COUNTER_KNOCKS = [(.0337, -32, 140, 0.13, -6, 0.31), (.2341, -33, 224, 0.037, -2, 2.1),
                  (.3007, -47, 144, .04, 7, 0.46), (.374, -29, 103, 0.034, 3, 0.18),
                  (.4717, -22, 366, 0.023, 8, 3.6), (.5034, -21, 147, 0.012, 1, 0.74),
                  (.8347, -44, 125, 0.063, 11, 2), (.915, -38, 407, 0.026, 20, 7.2),
                  (.9824, -41, 120, 0.078, 11, 2.1), (1.0168, -27.5, 94, 0.16, 8, 0.29),
                  (1.0445, -26, 116, 0.018, -3, 2), (1.1491, -33, 269, 0.2, -2, 4.5),
                  (1.1847, -32, 109, 0.055, 3, 0.39), (1.226, -35, 216, 0.064, -3, 7.1),
                  (1.3203, -31, 383, 0.15, 10, 3.3), (1.5304, -45, 270.5, 1, 12, 4.4),
                  (1.6875, -35.5, 134, 0.085, 23, 0.44), (1.7171, -25, 237, 0.074, 7, 0.69),
                  (1.8728, -37.5, 286, 0.18, 14, 1.1), (2.6305, -34, 267, 0.036, 0, 4.9),
                  (2.7207, -36, 74, 0.16, 15, 0.52), (2.7295, -27, 1600, 0.01, 5, 0.9),
                  (2.722, -38, 175, 0.064, 14, 1.7), (2.866, -39.5, 426, 0.055, 8, 1.7),
                  (2.8083, -40.5, 345, 0.08, 12, 3.7), (3.2205, -45, 340, 0.47, 1, 1),
                  (3.4135, -32, 2150, 0.013, 3, 0.6), (3.417, -22, 580, 0.035, 0, 1.5),
                  (3.427, -30, 371, 0.36, 4, 1.1), (3.435, -40, 250, 0.044, 11, 1.7),
                  (3.661, -42, 97, 0.082, 13.5, 1.3), (3.7422, -28.5, 228, 0.11, 4, 1.2),
                  (3.752, -22.5, 515, 0.049, 4.5, 0.34), (3.7535, -24, 1766, 0.021, 1, 0.78),
                  (3.7605, -32, 1040, 0.02, 5, 2.1), (3.788, -49, 203, 0.71, -2, 3),
                  (4.35, -50.5, 309.4, 0.33, 4, 5), (4.505, -45, 134.8, 0.39, -0.5, 1.3),
                  (4.553, -45.5, 331, 0.42, -1.5, 3.7), (4.825, -54, 272, 0.13, -8, 2.1),
                  (4.8811, -36, 110, 0.12, 4, 0.35), (4.9811, -36, 208, 0.13, 1, 0.48),
                  (5.0967, -44, 331, 0.12, 3, 12), (5.165, -41, 285, 0.043, -23, 0.95),
                  (5.3169, -45, 345, 0.56, 8, 0.54)]


def knocks():
    """Things knock on the counter: mostly low, strongly wavering tones with a puff of noise."""
    return rings(COUNTER_KNOCKS, stray_ms=0.098, waver=0.26, smooth_cycles=0.77, puff_share=0.26, jerky=0.12,
                 wet_db=-13)


# Bounce off the counter top.
# Each row: time in seconds, extra path to the left microphone in ms, to the right in ms,
# strength left from 0 to 1, strength right from 0 to 1.
COUNTER_BOUNCE = [(0, 0.65, 1.48, 0.15, 0.43), (1.9, 1.16, 1.56, 0.15, 0.2), (2.4, 0.24, 0.68, 0, 0),
                  (3.0, 1.75, 1.7, 0.24, 0.2), (3.4, 0.9, 0.89, 0.14, 0.3), (4.0, 1.21, 0.98, 0.47, 0.52),
                  (4.5, 1.3, 1.4, 0.03, 0.13), (5.51, 0.81, 1.4, 0, 0)]


def bounced(pair):
    """The counter returns a duller copy about a millisecond later, which combs the middle of the spectrum."""
    n = np.arange(N)
    left_ms, right_ms, *strength = curve(COUNTER_BOUNCE, n / SR)
    dull = coloured(pair, lambda hz: band(hz, 0, 6400))
    copies = [g * np.interp(n - ms * SR / 1000, n, x)
              for x, ms, g in zip(dull, (left_ms, right_ms), strength)]
    return pair + copies


COUNTER_BLUR = .12  # width of each mode as a share of its pitch
# Modes of the counter.
# Each row: frequency in Hz, relative level in dB, time to fall by 60 dB in seconds.
COUNTER_MODES = [(250, -1, 0.69), (345, 1, 0.52), (460, 1, 0.59), (510, -3, 0.22), (580, -2, 0.47),
                 (820, 1, 0.95), (950, -1, 0.41), (1190, 4.5, 0.45), (1650, -9.5, 0.5), (1900, -17, 0.41),
                 (2420, -24.5, .4), (3500, -23.5, 0.33), (5200, -27, .45)]
# The firmest blows, after which the counter rings on.
# Each row: start in seconds, level in dB, hardness in dB per octave.
FIRM_BLOWS = [(2.731, -54.5, -7), (3.428, -49.5, -4.5), (3.753, -56.5, 4), (4.886, -60, -7)]


def counter():
    """Each firm blow shakes every mode as a fuzzy band; a harder blow favours the high ones."""
    pair, t = np.zeros((2, N)), np.arange(SR // 2) / SR
    chance = rng.standard_normal((len(FIRM_BLOWS), 2, len(t)))
    for (s, blow_db, hardness_db), noise in zip(FIRM_BLOWS, chance):
        ring = np.zeros((2, len(t)))
        for hz, db, t60 in COUNTER_MODES:
            fuzzy = evened(coloured(noise, lambda f: band(f, hz, COUNTER_BLUR * hz)))
            ring += amp(db + hardness_db * np.log2(hz / 500) - 60 * t / t60) * fuzzy
        for side, sound in zip(pair, ring):
            add(side, s, amp(blow_db) * sound * np.minimum(t / 0.006, 1))  # 6 ms rise
    return pair


ROOM_DB = -85  # level of the hum
# Colour of the quiet room.
# Each row: frequency in Hz, relative level in dB per Hz.
ROOM_COLOUR = [(25, -18), (60, 15.5), (130, -4.5), (300, -1.5), (500, -19.5), (1000, -36.5), (1800, -21),
               (3000, -22), (7000, -43.5), (16000, -44.5)]
# Two thin bands of hiss in the treble.
# Each row: frequency in Hz, width in Hz, level in dB before the swell.
HISS_BANDS = [(10420, 540, -82), (14700, 950, -83)]
# Swell of the thin hiss.
# Each row: time in seconds, change of level in dB.
HISS_SWELL = [(0, -5), (3.3, -12), (3.8, -2), (4.3, 0.5), (4.6, -12.5), (5.51, -7)]


def room():
    """A faint low hum of the house made of coloured noise, and two thin bands of hiss."""
    hum = amp(ROOM_DB) * evened(coloured(noise_pair(), lambda hz: amp(read(ROOM_COLOUR, hz))))
    thin = np.zeros(N)
    for f, w, db in HISS_BANDS:
        thin += amp(db) * evened(coloured(rng.standard_normal(N), lambda hz: band(hz, f, w)))
    return hum + thin * amp(curve(HISS_SWELL, np.arange(N) / SR)[0])


def scene():
    """The handling bounces off the counter; its ringing and the room are added."""
    handling = ticks() + pops() + rustle() + knocks()
    return bounced(handling) + counter() + room()


SHARED_HZ, SKEW_MS, IN_STEP_HZ = 6850, 0.18, 11640  # crossover, lead of the right, where phases agree
EDGE_HZ = 16500  # upper band limit


def record(dry):
    """Both channels take their treble from one microphone, the right a little ahead; bass roll-off; band limit."""
    left, right = dry
    shared = lambda hz: 1 / (1 + (SHARED_HZ / (hz + 1)) ** 12)
    skew = lambda hz: np.exp(2j * np.pi * (hz - IN_STEP_HZ) * SKEW_MS / 1000)
    own_low = coloured(right, lambda hz: np.sqrt(1 - shared(hz)))
    shared_treble = coloured(left, lambda hz: np.sqrt(shared(hz)) * skew(hz))
    roll_off = signal.butter(4, 50, "high", fs=SR, output="sos")
    both = signal.sosfilt(roll_off, [left, own_low + shared_treble])
    limit = signal.firwin(255, EDGE_HZ, window=("kaiser", 9), fs=SR)
    return signal.oaconvolve(both, limit[None], "same")


dry = scene()
out = record(dry)
dump(out)
```